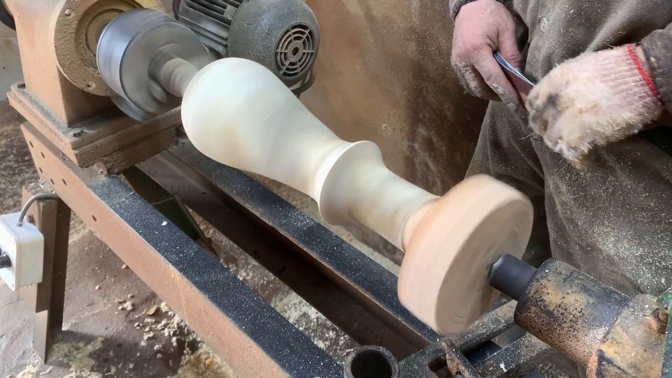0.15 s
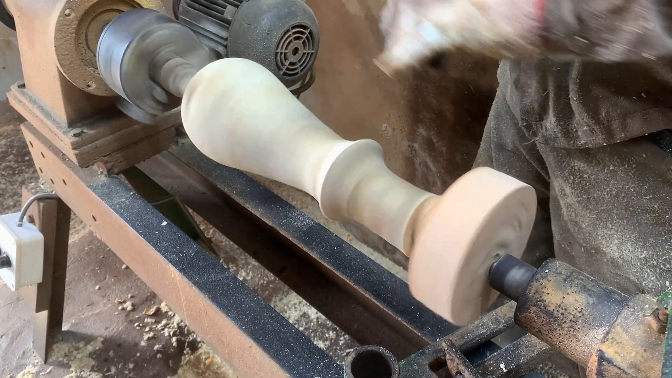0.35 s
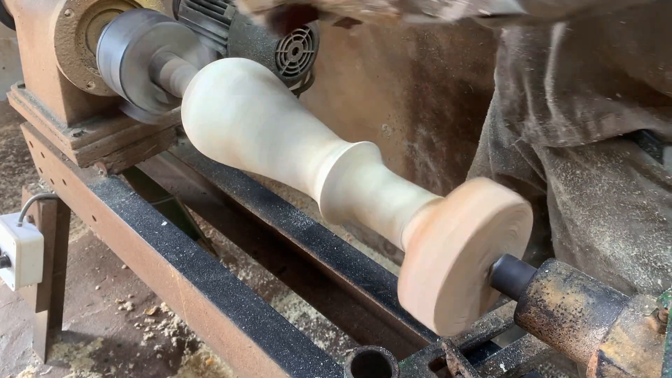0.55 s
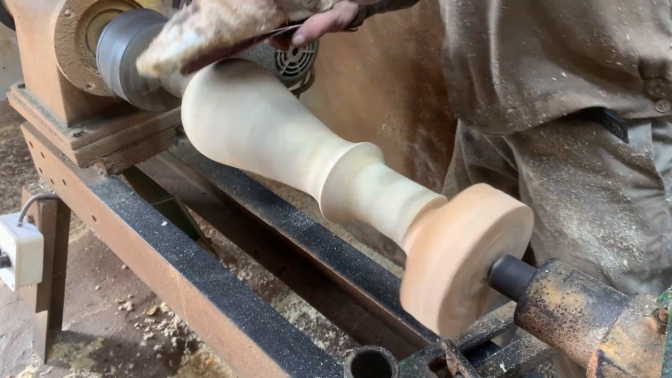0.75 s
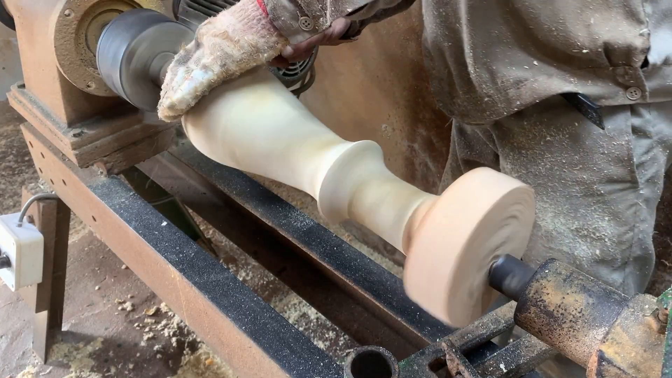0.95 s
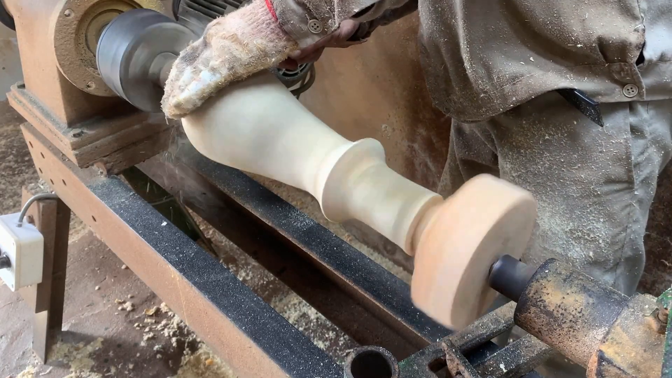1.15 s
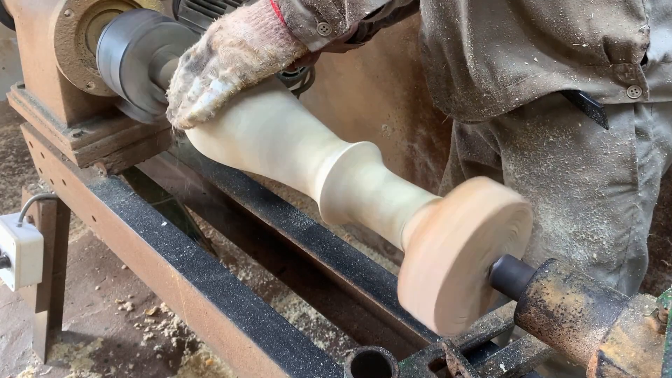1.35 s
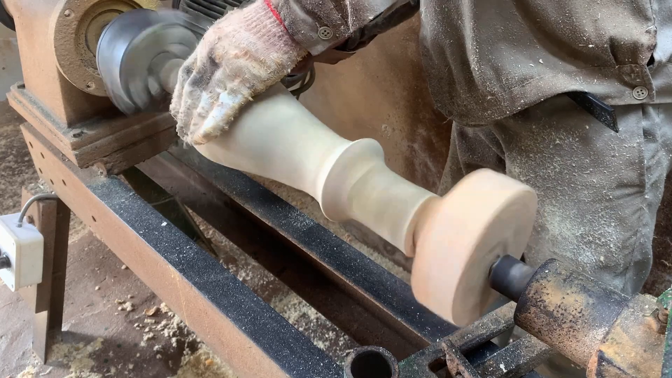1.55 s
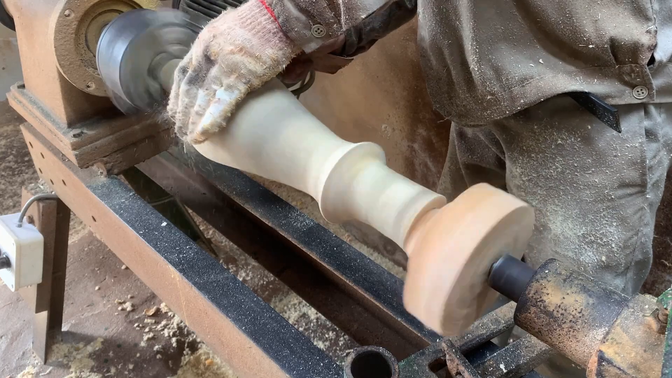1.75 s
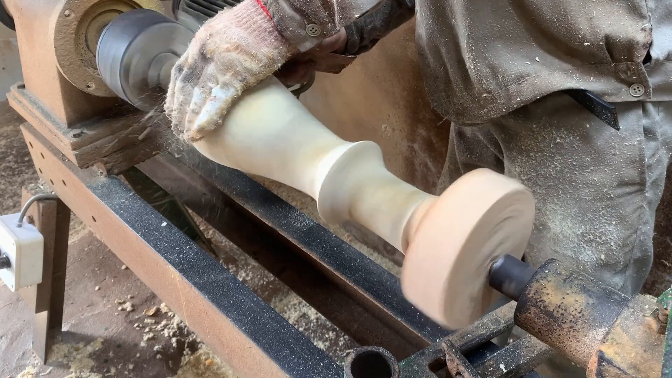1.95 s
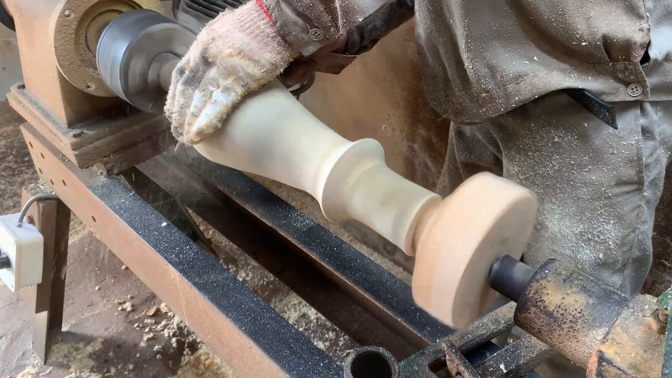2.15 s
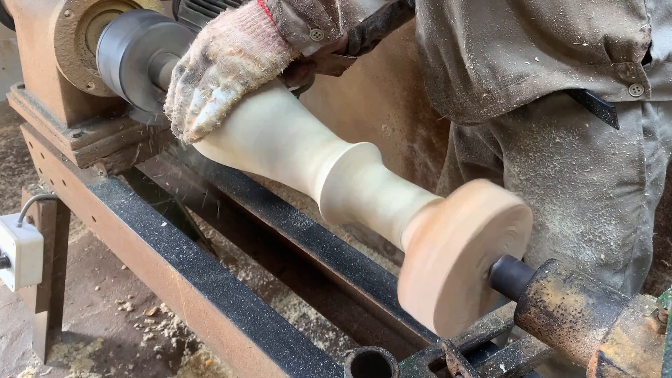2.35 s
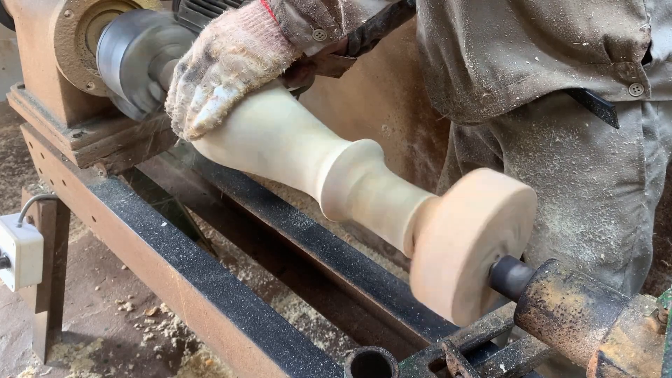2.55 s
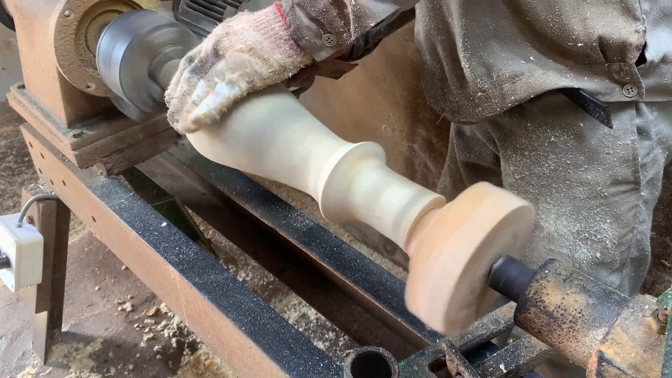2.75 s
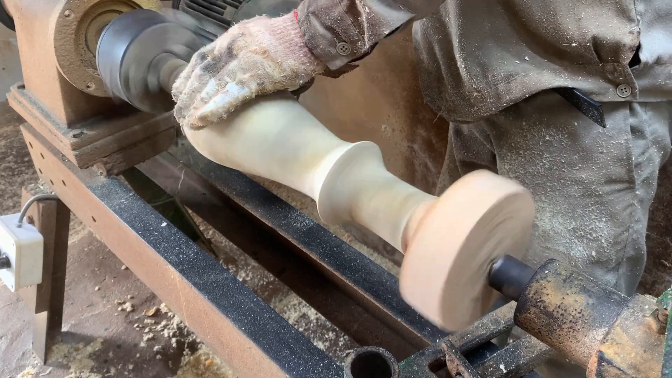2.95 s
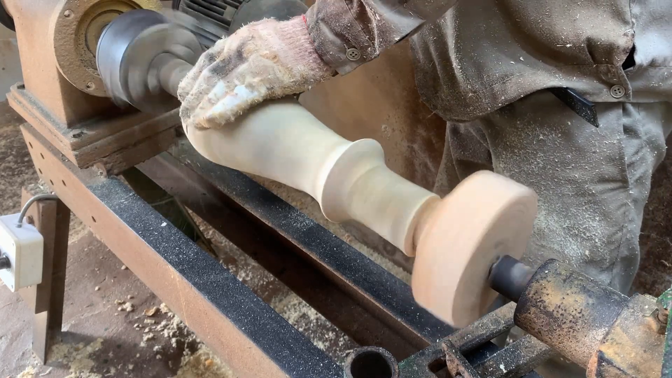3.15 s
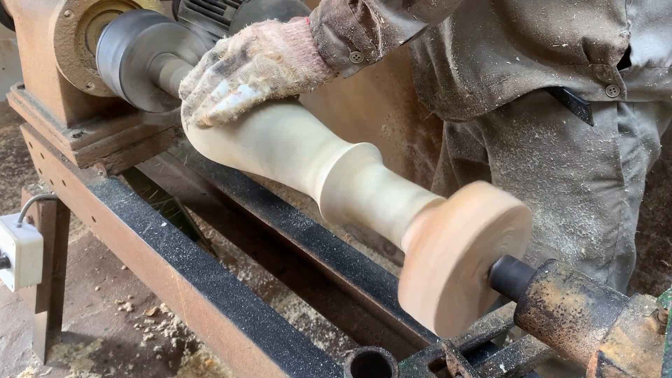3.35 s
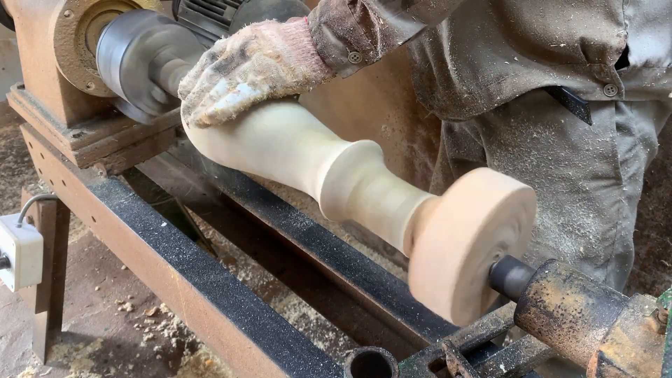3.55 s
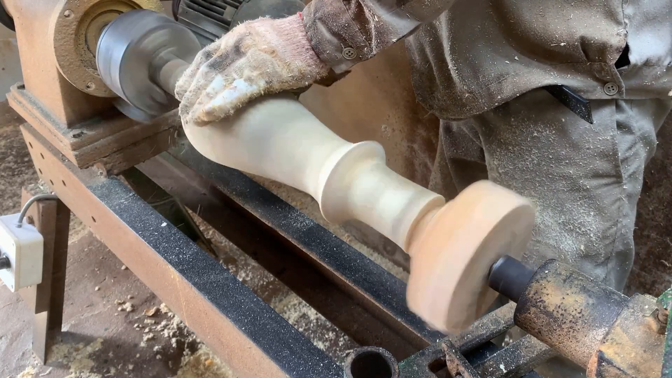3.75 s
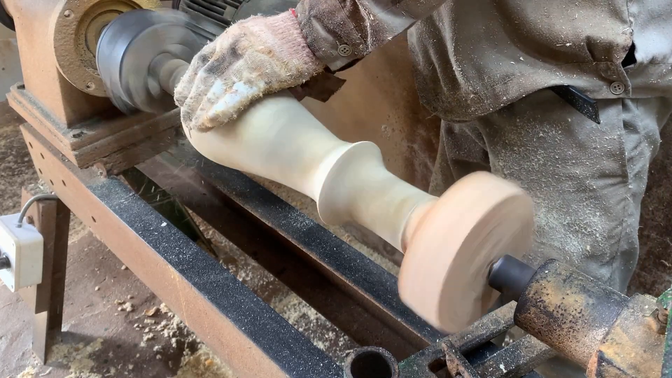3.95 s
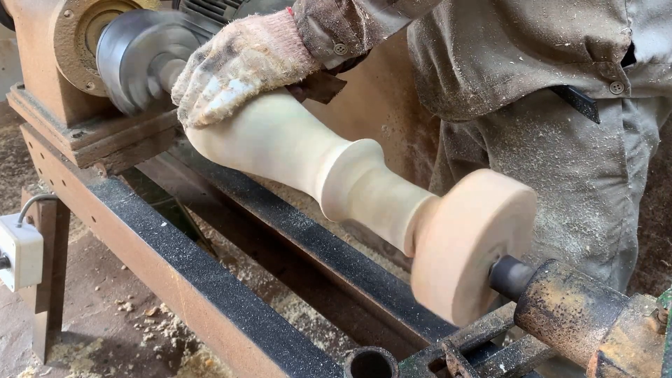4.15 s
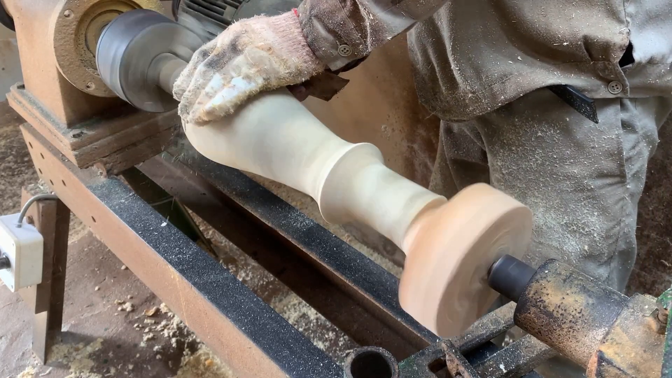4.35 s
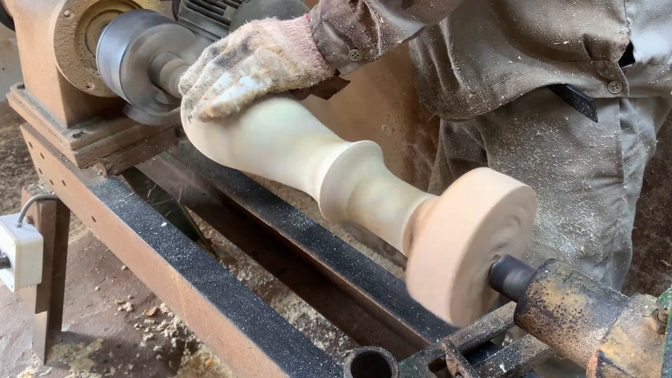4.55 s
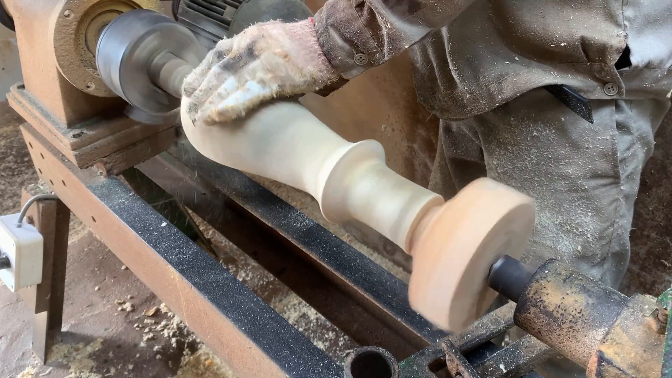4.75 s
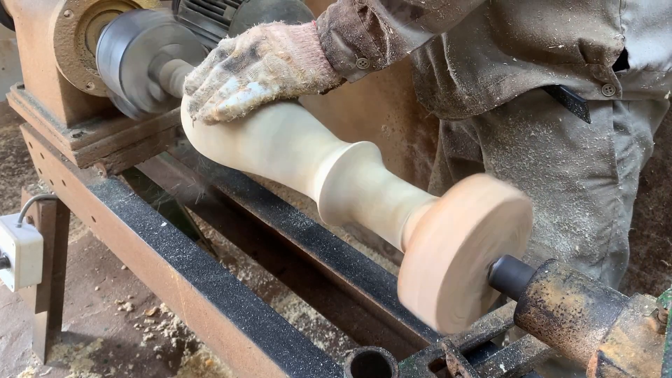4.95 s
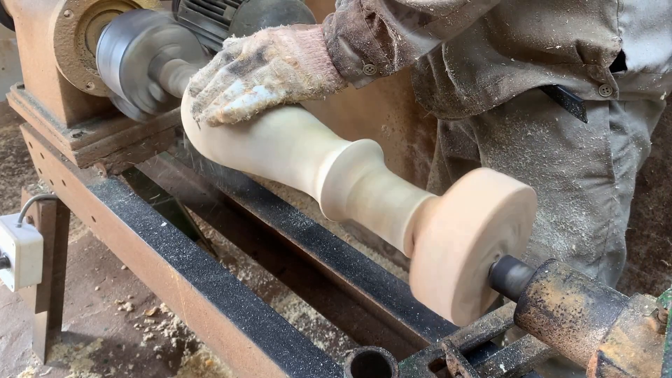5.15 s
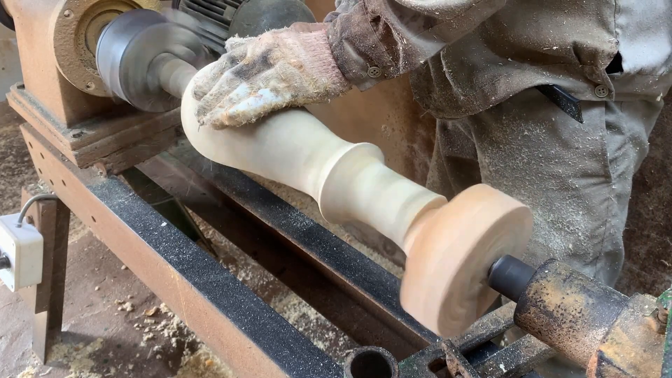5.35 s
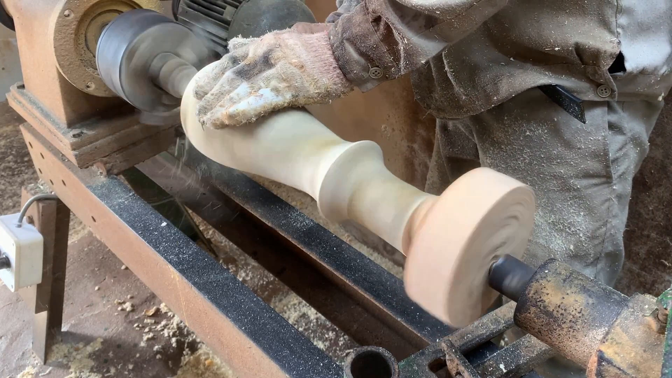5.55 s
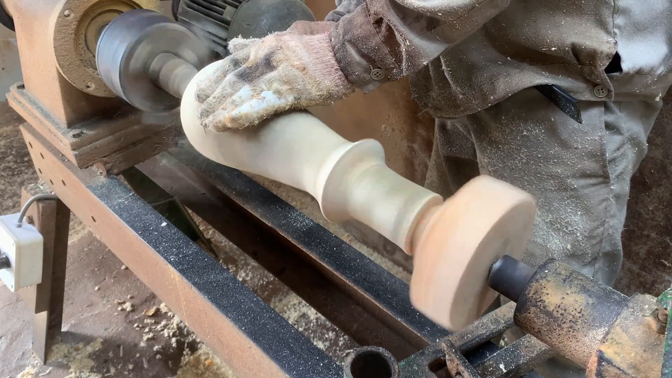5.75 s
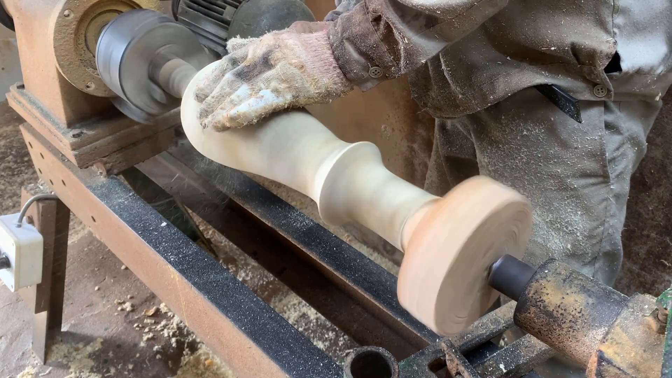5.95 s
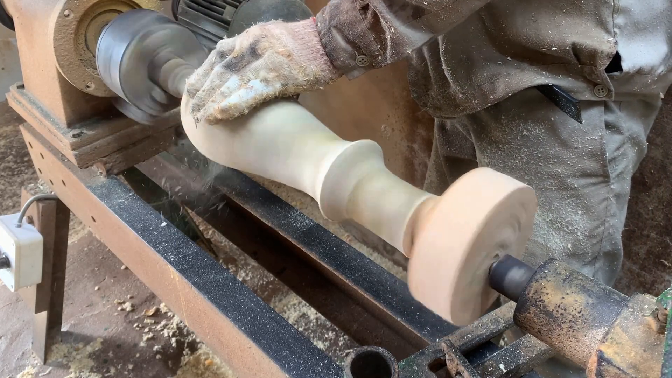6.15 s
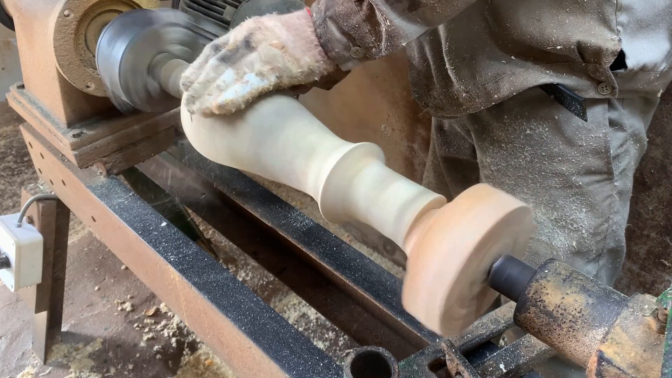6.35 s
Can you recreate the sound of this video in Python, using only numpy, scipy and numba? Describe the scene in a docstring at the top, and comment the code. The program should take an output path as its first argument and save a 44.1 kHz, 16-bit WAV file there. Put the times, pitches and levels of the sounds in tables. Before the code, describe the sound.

A wood lathe hums and whines with quick belt knocks, then a gloved hand presses sandpaper on spinning wood with a loud, gritty, pulsing hiss.

```python
"""A wood lathe spins a turned baluster in a small workshop, about eight turns a second, close to the microphone.
From the start the motor hums, its inverter whines, a panel drones, and the belt joint strikes and rings the frame.
In the first 0.8 s a loose part also rattles as decaying noise bursts ring its modes; thumps come now and then.
Then a gloved hand presses sandpaper on the wood: filtered noise hisses, swelling as high spots come round,
and clumps of grit catch in short narrow-band screeches; the bite eases as the wood gets smooth."""
import sys
import numpy as np
from scipy import signal
from scipy.fft import rfft, irfft
from scipy.io import wavfile
from scipy.ndimage import uniform_filter1d
from numba import njit

SR = 44100
rng = np.random.default_rng(int(sys.argv[2]) if len(sys.argv) > 2 else 0)


def dump(signal):
    """Clip the signal to [-1, 1] and save it as 16-bit WAV at the path in sys.argv[1]."""
    limited = np.clip(np.atleast_2d(signal).T, -1, 1)
    pcm = np.round(limited * 32767).astype(np.int16)
    wavfile.write(sys.argv[1], SR, pcm)


N = 281799
T = np.arange(N) / SR


def undb(db):
    """Logarithmic level: decibels to amplitude gain."""
    return 10 ** (np.asarray(db) / 20)


def level(x, db=0):
    """Energy normalisation: set the rms level."""
    return x * undb(db) / np.sqrt(np.mean(x ** 2))


def curve(table, axis=1):
    """Linear interpolation: one column of a table against time."""
    rows = np.array(table)
    return np.interp(T, rows[:, 0], rows[:, axis])


def pan(db):
    """Interchannel level difference: channel gains for a left-minus-right level."""
    return undb(np.array([[db], [-db]]) / 2)


def noise():
    """Uncorrelated white noise at the two ports."""
    return rng.standard_normal((2, N))


def walk(rate):
    """Low-pass random process: levels held 1 / rate s and smoothed twice; spread near 1."""
    hold = int(SR / rate)
    steps = np.repeat(rng.standard_normal(N // hold + 1), hold)
    return 1.3 * uniform_filter1d(uniform_filter1d(steps, hold), hold)[:N]


def colour(x, points):
    """Linear filtering: shape the spectrum by (frequency [Hz], gain [dB]) points."""
    hz, db = np.transpose(points)
    f = np.maximum(np.fft.rfftfreq(2 * SR * 4, 1 / SR), 1)
    gain = undb(np.interp(np.log(f), np.log(hz), db))
    return irfft(rfft(x, 2 * (len(f) - 1)) * gain)[..., :N]


@njit
def resonate(x, hz, width):
    """Resonance: a state-variable band-pass with a moving centre, gain 1 there."""
    y, band, low = np.empty(len(x)), 0., 0.
    for i in range(len(x)):
        g, damping = np.tan(np.pi * hz[i] / SR), width / hz[i]
        v = (band + g * (x[i] - low)) / (1 + g * (g + damping))
        band, low, y[i] = 2 * v - band, low + 2 * g * v, damping * v
    return y


def ring_both(x, centre, width):
    """Resonance at each port alike."""
    return np.array([resonate(side, centre, float(width)) for side in x])


def swell(x, centre, width):
    """Gaussian envelope: a bell-shaped rise and fall."""
    return np.exp(-((x - centre) / width) ** 2 / 2)


def between(start, end):
    """Gating: a window in time with sloping sides."""
    fade = min((end - start) / 3, .3)
    return np.clip((T - start) / fade + .5, 0, 1) * np.clip((end - T) / fade + .5, 0, 1)


def workshop(x, wet_db, t60):
    """Diffuse reverberation: add an exponentially decaying noise tail, different at each port."""
    t = T[:SR // 2]
    tail = rng.standard_normal((2, len(t))) * undb(-60 * t / t60) * (t > .004)
    tail /= np.sqrt(np.sum(tail ** 2, axis=1, keepdims=True))
    return x + undb(wet_db) * signal.fftconvolve(x, tail, axes=1)[:, :N]


# a panel that drones with the motor: (centre [Hz], width [Hz], level [dB])
DRONING_PANEL = (229, 12.3, -51)


def panel():
    """Forced vibration: one panel drones throughout, as narrow-band noise."""
    hz, width, db = DRONING_PANEL
    band = signal.butter(2, [hz - width / 2, hz + width / 2], "band", fs=SR, output="sos")
    return level(signal.sosfilt(band, noise()), db)


def tone(hz, db):
    """Random modulation: a line shimmers by reflections off the spinning parts, a touch later at the right."""
    shimmer = np.array([1 + .22 * (walk(22) + 1j * walk(22)) for _ in range(2)])
    lag_s = np.array([[0], [2e-5]])
    line = np.exp(2j * np.pi * (hz * (T - lag_s) + rng.random()))
    return level(np.real(shimmer * line), db)


SUPPLY_HZ = 59.2  # inverter output
# lines of the magnetic hum, one entry a line: (multiple of the supply rate)
HUM_MULTIPLES = [1, 3, 4, 6]
# their strength before the arm shades them: (level [dB])
HUM_LEVELS = [-49, -60.5, -55.5, -45.5]
# how strongly each fades once the arm covers the motor: (multiple of the shading)
HUM_FADES = [2.4, 2.3, 2.9, 1.75]
# spectrum of bearings and fan: (frequency [Hz], relative density [dB per Hz])
RUNNING_SPECTRUM = [(15, -44), (25, -16), (63, -10.5), (113, -11), (200, -10), (277, -11), (375, -3),
                    (545, -16), (719, -7.5), (850, -17), (1060, -14.5), (1270, -16.5), (1470, -18),
                    (1680, -19), (2200, -21), (2420, -23.5), (2850, -25), (5340, -35.5), (6060, -31),
                    (6870, -40), (8390, -37.5), (10300, -47), (13000, -77), (22000, -120)]


def motor():
    """Magnetostatic force and turbulence: hum at multiples of the supply rate, and the rush of fan and bearings."""
    # the machine is quieter once the hand steadies the work and the arm covers the motor;
    # each part below scales this shading by a factor of its own
    shading = np.interp(T, [.7, 1.05], [0, -4])
    hum = 0
    for multiple, db, fade in zip(HUM_MULTIPLES, HUM_LEVELS, HUM_FADES):
        hum = hum + tone(multiple * SUPPLY_HZ, db) * undb(fade * shading)
    shared = 0.22 * rng.standard_normal(N)
    rush = level(colour(noise() + shared, RUNNING_SPECTRUM), -35.5)
    rumble = colour(rush, [(90, -3.0), (180, -10)])
    upper = (rush - rumble) * undb(0.37 * walk(6.3) + 1.22 * shading)
    rumble = rumble * undb(1.9 * walk(10) + 0.84 * shading)
    return hum * pan(-3) + (upper + rumble) * pan(-2.2)


SWITCH_HZ, MAINS_HZ = 6002.5, 50  # inverter switching; mains rate
# lines of the whine: (multiple of the switching rate, offset in supply rates, level before the sway [dB])
WHINE_LINES = [(1, -2, -78), (1, -.5, -60.5), (1, 1, -76), (2, -6, -60), (2, 0, -42.5), (2, 6, -65)]
# the hand-held microphone sways through standing waves: (time [s], lag of the right port [s], whine gain [dB])
MICROPHONE_SWAY = [(0, -59e-6, 2), (.7, -57e-6, 1.5), (1.2, -57e-6, -5.5), (1.5, 0, -4.5), (1.7, 38e-6, -5),
                   (2.65, 35e-6, -8), (3.3, 35e-6, -3.5), (3.5, 0, -3), (3.75, -43e-6, -5.5),
                   (3.95, -8e-6, -5), (4.4, -2e-6, -6), (4.65, 40e-6, -6), (4.95, 5e-6, -4.5),
                   (5.5, -38e-6, -3), (6.05, -6e-6, -4.5), (6.4, 12e-6, -5.5)]


def whine():
    """Phase modulation: the switching makes the motor whistle in lines that wobble slightly at the mains rate."""
    heard = T - np.outer([0, 1], curve(MICROPHONE_SWAY))
    wobble = .21 * np.sin(2 * np.pi * MAINS_HZ * T)  # radians, for the first switching multiple
    lines = 0
    for multiple, offset, db in WHINE_LINES:
        hz = multiple * SWITCH_HZ + offset * SUPPLY_HZ
        phase = 2 * np.pi * (hz * heard + rng.random()) + multiple * wobble
        lines = lines + undb(db) * np.sqrt(2) * np.sin(phase)
    roughness = 1 + 0.3 * walk(120) + 0.086 * walk(600)
    return lines * roughness * undb(curve(MICROPHONE_SWAY, axis=2))


BELT_LAPS_PER_TURN, BELT_START_LAPS, BELT_LAG_S = 1.59, .56, 0.004043
# modes of the lathe frame: (frequency [Hz], relative level [dB], t60 [s])
FRAME_MODES = [(354.3, -2.2, 0.16), (390.4, -7, 0.13), (629, -10.5, 0.11), (696.8, -7, 0.11),
               (741.6, -9, 0.1), (1060, -11, 0.079), (1481, -11, 0.11), (2220, -17, 0.14)]
# chatter of the belt on its pulleys: (frequency [Hz], relative density [dB per Hz])
CHATTER_SPECTRUM = [(150, -26), (300, -6.5), (370, -3), (440, -5.5), (560, -16.5), (710, -4.5),
                    (850, -14.5), (1070, -7), (1270, -9.5), (1470, -13.5), (1700, -13), (2200, -13.5),
                    (2450, -23), (4000, -29), (9000, -41), (14000, -70)]
# slaps that land harder or softer than the rest: (time [s], low modes [dB], high modes [dB])
SLAP_ACCENTS = [(.06, 0, -1), (.14, 3, 3), (.22, 2, 2), (.29, 1, -4), (.37, 8, 4), (.45, -3, 1),
                (.53, 4.5, 6.5), (.6, 0, 3), (.68, 6, -2), (.76, 5.5, 0), (.91, 4, 1), (.98, 4, -1),
                (1.06, 1, -1), (1.14, -7, 1.5), (1.21, -9, -3), (1.29, -1, 2), (1.45, 1.5, 3), (1.53, 0, 4),
                (1.6, 2.5, -1), (1.68, -4, -5), (1.99, -4, 2), (2.07, -4, -6), (2.15, -1.5, 6.5),
                (2.54, -6, -5), (2.62, 3.5, 2), (2.7, -1.5, -1), (2.77, -5, 3), (2.85, 4, 2), (2.93, -1, 0),
                (3.01, 0, -1), (3.09, -2, -8), (3.24, 3, -2), (3.32, -1, -4), (3.48, 0, -1), (3.55, -3, 4),
                (3.63, -2, 0), (3.71, -3.5, -2), (3.79, 3, 0), (3.87, -3, 0), (3.94, 5, 5), (4.02, 1, -0.5),
                (4.1, 0, 1), (4.33, 0, -5), (4.41, -6, 2), (4.57, 2, 2), (4.72, 2, 4.5), (4.88, 6, 6),
                (5.04, -2, -2), (5.19, -4, -2), (5.27, -8, 1.5), (5.35, 5, -4), (5.43, 3, -4),
                (5.5, -0.5, 5), (5.58, 1, -6), (5.66, -1, 1), (5.82, -4, -4), (5.89, 2, 0), (5.97, -7, 3),
                (6.05, 2, 3), (6.13, -1.5, 0), (6.21, 2, 0), (6.29, 0.5, -3)]


def belt(turns):
    """Impact excitation of modes: the belt's joint hits a pulley once a lap, with a scuff, and the frame rings."""
    laps = BELT_LAPS_PER_TURN * np.interp(T - BELT_LAG_S, T, turns) + BELT_START_LAPS
    lap = np.floor(laps)
    accents = {lap[int(at * SR)]: db for at, *db in SLAP_ACCENTS}
    hz, db, t60 = np.transpose(FRAME_MODES)[:, :, None]
    t = T[:SR // 5]
    # the higher modes vary more in pitch and strength from blow to blow
    high = np.clip((hz - 400) / 200, 0, 1)
    detune = .015 + .01 * high
    # the rubber is soft, so the ring builds up over several cycles
    rise_s = 0.018
    shape = undb(db - 60 * t / t60) * (1 - np.exp(-(t / rise_s) ** 2))
    ring = np.zeros((2, N + len(t)))
    for start in np.flatnonzero(np.diff(lap)) + 1:
        low_db, high_db = accents.get(lap[start], (0, 0))
        tune, size = rng.standard_normal((2, len(FRAME_MODES), 1))
        # in the reverberant field the two ports hear each mode about a quarter cycle apart
        apart = rng.choice([-.25, .25]) + .04 * rng.standard_normal((len(FRAME_MODES), 1))
        phase = rng.random() + high * rng.random((len(FRAME_MODES), 1)) + np.array([0 * apart, apart])
        modes = np.sin(2 * np.pi * (hz * (1 + detune * tune) * t + phase))
        # an accent acts mainly on the frame's strong modes, below about 1 kHz
        accent_db = np.interp(hz, [400, 600, 800, 1400], [low_db, high_db, high_db, 0])
        strength = undb(accent_db + .5 * (1 + high) * size)
        ring[:, start:start + len(t)] += np.sum(modes * shape * strength, axis=1)
    # a main scuff, then a weaker one as the slack side swings back; places in laps
    scuff = swell(laps % 1, .22, .08) + .45 * swell(laps % 1, .52, .17)
    chatter = colour(noise() * scuff * undb(3.6 * walk(400)), CHATTER_SPECTRUM)
    slaps = level(ring[:, :N], -36.0) + level(chatter, -44.5)
    return workshop(slaps, wet_db=-16, t60=.3) * pan(-1.5)


# dry rattles while the spindle runs free: (time [s], level [dB], decay [s])
RATTLE_TIMES = [(.137, -35, .016), (.217, -39, .012), (.284, -34, .016), (.366, -28, .017),
                (.517, -33.5, .012), (.593, -32, .01), (.673, -32.5, .014), (.745, -31, .02)]
# what the loose part rings with: (frequency [Hz], width [Hz], relative level [dB])
LOOSE_PART_MODES = [(720, 90, 0), (1070, 100, 2.5), (1480, 90, 2), (1870, 180, -10), (2230, 130, -3.5),
                    (2830, 300, -12), (4080, 200, -13)]


def rattles():
    """Modal response to noise: something loose chatters in dying bursts of clicks that ring its modes."""
    rise_s, force = 0.004, 0
    for at, db, decay in RATTLE_TIMES:
        onset = np.clip((T - at) / rise_s + .5, 0, 1)
        force = force + undb(db) * onset * np.exp(-np.abs(T - at) / decay)
    clicks = level(noise() * undb(2 * walk(700))) * force
    ring = 0
    for k, (hz, width, db) in enumerate(LOOSE_PART_MODES):
        sign = (-1) ** k  # neighbouring modes in opposite phase
        ring = ring + sign * undb(db) * ring_both(clicks, np.full(N, float(hz)), width)
    ring = colour(ring, [(4500, 0), (9000, -12), (13000, -45)])
    return level(ring) * np.sqrt(np.mean(force ** 2))


# handling thumps: (time [s], frequency [Hz], half length [s], peak before pan [dB], rumble re thud [dB])
HANDLING_THUMPS = [(.025, 176, 0.025, -32.5, -25), (0.288, 65, .012, -37, -11),
                   (2.357, 200, 0.0038, -25, -16), (2.372, 70, 0.006, -39, -3),
                   (3.395, 72, 0.0061, -30, -13), (3.428, 65, .01, -40, -9), (3.758, 74.5, 0.0064, -36, -2),
                   (3.915, 75, 0.0076, -29.5, -13), (3.975, 60, 0.016, -35, -10),
                   (4.025, 60, 0.011, -39, -13), (5.847, 141, 0.0033, -28.5, -18),
                   (5.876, 88, .009, -32, -11), (5.91, 105, 0.0034, -28, -11),
                   (5.962, 66, 0.0095, -29.5, -11)]


def thumps():
    """Structure-borne sound: each nudge of the hand on the microphone is a low thud within a short rumble."""
    shared = 0.63 * rng.standard_normal(N)
    rumble = colour(noise() + shared, [(15, -10), (32, -1), (90, -7), (260, -18), (2000, -80)])
    rumble = level(rumble)
    out = 0
    for at, hz, length, db, rumble_db in HANDLING_THUMPS:
        t = T - at - np.array([[0], [0.0013]])  # the right port moves 1.3 ms later
        thud = np.sin(2 * np.pi * (hz * t + rng.random())) * swell(T, at, length)
        around = undb(rumble_db) * rumble * swell(T, at, 3.0 * length)
        out = out + undb(db) * (thud + around)
    return out * pan(-1)


# clumps of grit that catch: (time [s], centre [Hz], width [Hz], half length [s], level before envelope and pan [dB])
GRIT_CATCHES = [(0.903, 1700, 900, .012, -29), (0.945, 2780, 1100, 0.0078, -18),
                (1.084, 3300, 2500, .008, -24), (1.327, 2000, 1400, 0.0095, -27),
                (1.332, 3700, 700, 0.0099, -26), (1.371, 3620, 700, 0.0076, -28),
                (1.408, 1550, 400, 0.0074, -30), (1.438, 3450, 600, .006, -31),
                (1.465, 4030, 700, 0.0086, -20), (1.84, 3450, 500, 0.0068, -33),
                (2.34, 4130, 900, 0.0051, -23), (2.836, 3300, 600, .01, -27), (2.947, 3760, 500, .008, -30),
                (2.99, 2720, 1800, 0.0072, -24.5), (3.11, 3640, 700, .008, -25),
                (3.126, 1600, 400, 0.0072, -34), (3.251, 2900, 600, .009, -21.5),
                (3.371, 1800, 600, .009, -28), (3.494, 2500, 1300, 0.0088, -27),
                (3.508, 5170, 700, .006, -30), (3.548, 3350, 400, .008, -29),
                (3.575, 3140, 1200, .008, -22), (3.693, 3960, 700, .006, -31),
                (3.746, 1730, 500, 0.0096, -28), (3.749, 4000, 1100, .008, -26),
                (3.87, 3200, 700, .008, -27), (3.995, 4310, 700, .008, -33),
                (3.997, 1720, 400, 0.011, -31.5), (4.126, 3150, 500, .008, -30.5),
                (4.24, 3550, 500, 0.01, -26.5), (4.614, 1760, 500, 0.011, -32),
                (4.61, 3750, 900, .01, -25.5), (4.735, 3150, 700, 0.0088, -31),
                (4.861, 2950, 400, 0.0082, -29), (4.983, 1770, 400, 0.011, -31),
                (5.108, 3960, 500, 0.0092, -28), (5.19, 2930, 400, .008, -31), (5.24, 5680, 800, .007, -26),
                (5.364, 4310, 700, .007, -31), (5.375, 1830, 400, .01, -29), (5.565, 2850, 250, .009, -29),
                (5.613, 3450, 600, .009, -26.5), (5.756, 4500, 1600, 0.011, -24),
                (5.838, 2200, 1300, 0.0092, -28), (5.86, 3770, 1500, .008, -25),
                (5.966, 2240, 900, .008, -28), (5.99, 4480, 900, .007, -32),
                (6.013, 5400, 800, .007, -26.5), (6.023, 2240, 800, .007, -30),
                (6.104, 4310, 800, 0.0089, -31), (6.127, 5000, 900, .007, -31),
                (6.23, 2930, 600, .008, -31)]


def catches():
    """Stick-slip friction: a clump of grit catches for some milliseconds and rings paper and wood in one band."""
    out, count = np.zeros((2, N)), SR // 10
    for at, hz, width, length, db in GRIT_CATCHES:
        start = int(at * SR) - count // 2
        edges = [max(hz - width / 2, 100), hz + width / 2]
        band = signal.butter(2, edges, "band", fs=SR, output="sos")
        screech = level(signal.sosfilt(band, rng.standard_normal((2, count))), db)
        out[:, start:start + count] += screech * swell(T[start:start + count], at, length)
    return out * pan(-2.3)


def glance(x, count=18):
    """Comb interference: reflections between hand and wood come and go, so patches of the spectrum swell and fade."""
    out = x
    for lag in rng.integers(20, 150, count):  # samples
        out = out + .12 * walk(42) * np.roll(x, lag, axis=1)
    return out


def scratches(rate, decay_s):
    """Shot noise: grits dig in at random with a sudden start and a quick fade; mean 0, spread 1."""
    bites = (rng.random(N) < rate / SR) * rng.uniform(0.68, 1, N)
    fading = signal.lfilter([1], [1, -np.exp(-1 / (decay_s * SR))], bites)
    return level(fading - fading.mean())


# the paper lands, then bites less as the wood gets smooth
TOUCH_S, LANDING_S, SMOOTHING_S = 0.805, 0.057, 1.54
# on smooth wood: (hiss level [dB], rasp re hiss [dB], fizz re hiss [dB])
SMOOTH_LEVELS = [-26.5, -0.7, 0.34]
# extra on rough wood: (hiss [dB], rasp [dB], fizz [dB])
ROUGH_EXTRA = [4, 4, -0.5]
# the hand leans in or eases off: (time [s], half length [s], hiss [dB], rasp re hiss [dB], fizz re hiss [dB])
HAND_LEANS = [(0.858, 0.01, -1.5, 0.5, 9), (.905, .018, 0, 0.5, 2), (0.965, 0.023, 6.5, -4.5, 3),
              (1.283, 0.012, -4, 2, -1), (1.352, 0.073, 0, 1.5, -1), (1.465, 0.024, 0.5, -2.5, 1.5),
              (1.7, 0.33, 0.5, 0.8, 1), (3.244, 0.36, 2.5, 0.2, 1.5), (3.657, 0.15, 0.3, -1, 0.5),
              (4.425, 0.091, -0.4, -1, 0), (5.637, 0.57, 2.06, -1.2, 1.2), (6.33, .06, -1, -1.5, 0.5)]


def pressure():
    """Contact force: hiss, rasp and fizz in dB settle as the wood gets smooth and follow the leaning hand."""
    rough = np.exp(-np.maximum(T - TOUCH_S, 0) / SMOOTHING_S)
    settling = np.array(SMOOTH_LEVELS)[:, None] + np.outer(ROUGH_EXTRA, rough)
    return settling + sum(np.outer(db, swell(T, at, length)) for at, length, *db in HAND_LEANS)


# high spots the paper rides over: (start [s], end [s], angle [turns], width [turns], rise before centring [dB])
WOOD_HIGH_SPOTS = [(.8, 2.8, 0.11, 0.084, 1.5), (1, 2.76, 0.96, 0.023, 2.5), (2.63, 4.9, 0.95, 0.033, 3),
                   (3.04, 5.2, 0.32, 0.072, 3), (5.18, 6.36, 0.45, 0.12, 3.5)]
# sandpaper on wood: (frequency [Hz], relative density [dB per Hz])
GRIT_SPECTRUM = [(530, -46), (900, -12.5), (1720, -1.5), (2460, -1), (2840, 0), (3130, -0.5), (3790, 0.5),
                 (4700, -2.5), (5290, -2), (7490, -7.5), (8340, -8), (10500, -13), (12400, -14.5),
                 (14600, -22), (15700, -27)]
# resonances of paper and wood: (start [s], end [s], mean centre [Hz], width [Hz], mean level re grits [dB])
PAPER_RESONANCES = [(.8, 6.5, 1690, 140, -14), (1.02, 1.26, 6500, 700, -6), (1.3, 1.95, 1450, 350, -7),
                    (1.31, 1.66, 3950, 600, -3), (1.8, 2.45, 3480, 300, -6), (1.7, 6.5, 3950, 300, -15),
                    (2.8, 4, 3250, 600, -13), (4.5, 6.5, 1850, 300, -12), (4.5, 6.5, 2890, 130, -6.5)]


def sandpaper(turns):
    """Friction noise: countless grits catch and let go; paper, wood and the cupped hand colour their hiss."""
    hiss_db, rasp_db, fizz_db = pressure()
    ride_db = 0
    for start, end, angle, width, db in WOOD_HIGH_SPOTS:
        ride_db = ride_db + db * between(start, end) * swell((turns - angle + .5) % 1, 0.495, width)
    # centred on its quarter-second average
    ride_db = ride_db - uniform_filter1d(ride_db, SR // 4)
    # mostly fine scratches, now and then a coarse grit
    grits = noise() * undb(2.3 * np.minimum(rng.exponential(size=N), 4))
    grits = level(glance(grits)) * undb(.45 * scratches(70, .008))
    rings = 0
    for start, end, hz, width, db in PAPER_RESONANCES:
        centre = hz * (1 + 0.043 * walk(6.1))
        gain = between(start, end) * undb(db + 3.9 * walk(13))
        rings = rings + gain * ring_both(grits, centre, width)
    hiss = level(colour(grits + rings, GRIT_SPECTRUM))
    # a broad, firm contact rasps lower; the edge of the paper fizzes and flutters on its own
    rasp = colour(hiss, [(1900, 0), (2500, -6), (3300, -30)])
    fizz = colour(hiss, [(4500, -30), (6000, -6), (8000, 0)])
    body = (hiss - rasp - fizz) * undb(0.2 * walk(20)) * pan(-3.0)
    rasp = rasp * undb(rasp_db + 0.2 * walk(24.07) - 0.78 * ride_db) * pan(-0.58)
    flutter_db = 1.1 * scratches(50, .012) + 1.1 * walk(14)
    fizz = fizz * undb(fizz_db + flutter_db + 0.036 * ride_db) * pan(-0.48)
    rub = (rasp + body + fizz) * undb(hiss_db + ride_db)
    touch = np.clip((T - TOUCH_S) / LANDING_S, 0, 1) ** 2
    return workshop(rub * touch, wet_db=-19, t60=.2)


# spindle speed: (time [s], rate [turns per second])
SPINDLE_SPEED = [(0, 7.989), (.9, 8.293), (1.3, 8.083), (2.2, 8.051), (4.5, 8.071), (6.4, 8.03)]


def scene():
    """Superposition of the sources; the spindle's turning times both the belt and the sanding."""
    turns = np.cumsum(curve(SPINDLE_SPEED)) / SR
    machine = panel() + motor() + whine() + belt(turns) + rattles()
    return machine + thumps() + catches() + sandpaper(turns)


def record(dry):
    """Port resonance and saturation: ports ring near 8 kHz, the right most; peaks are rounded, the top cut steeply."""
    left = colour(dry[0], [(7950, 0), (8100, 2), (8300, 1), (9300, 0)])
    right = colour(dry[1], [(7920, -1), (8050, 9), (8250, 6), (8500, 3), (9100, 0)])
    top_cut = signal.ellip(10, .2, 80, 15600, fs=SR, output="sos")  # low-pass edge at 15600 Hz
    return signal.sosfilt(top_cut, np.tanh([left, right]))


dry = scene()
out = record(dry)
dump(out)
```